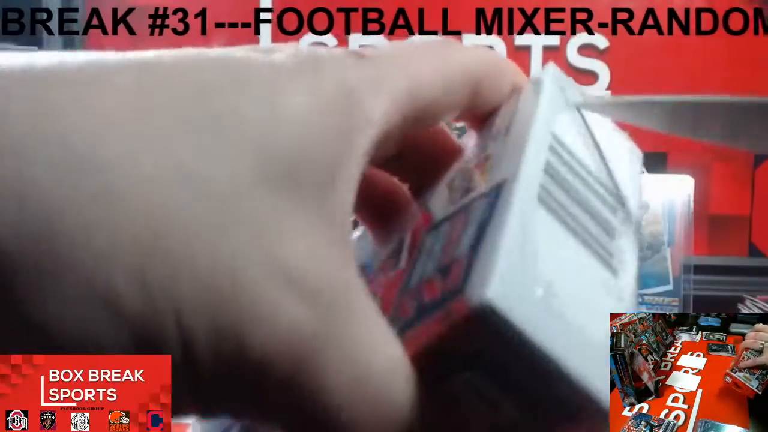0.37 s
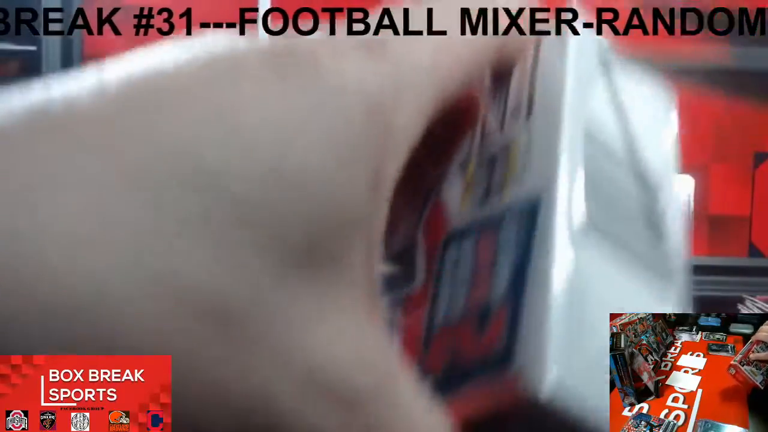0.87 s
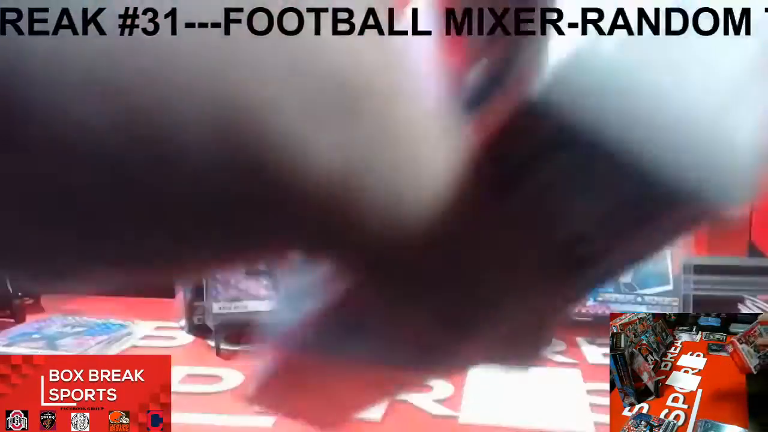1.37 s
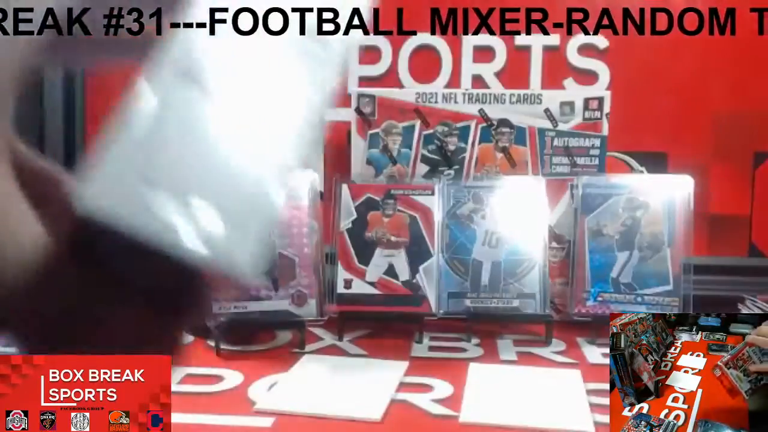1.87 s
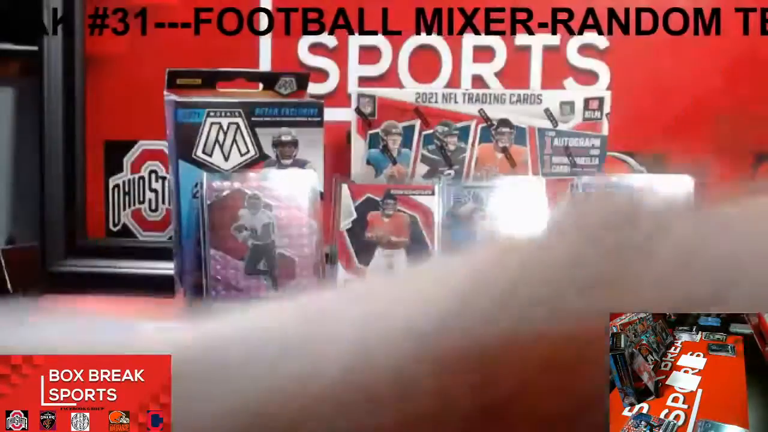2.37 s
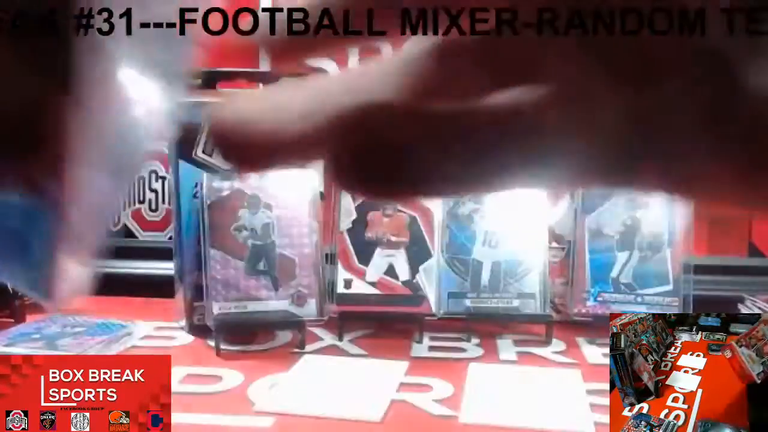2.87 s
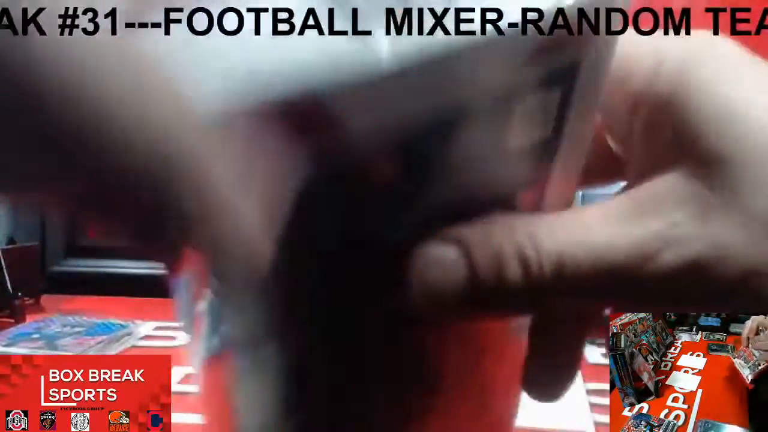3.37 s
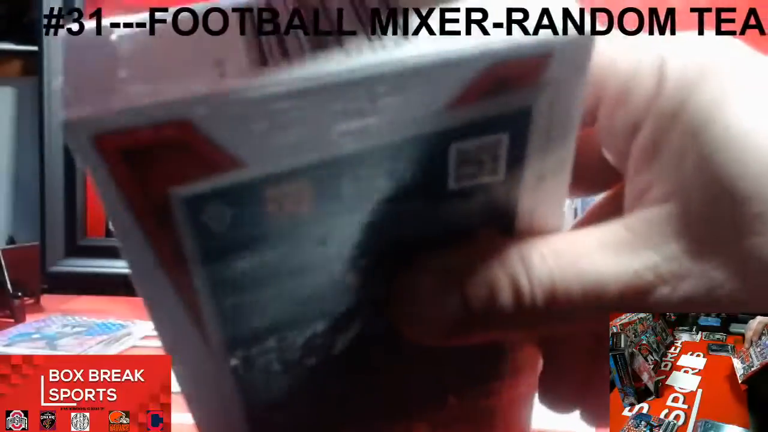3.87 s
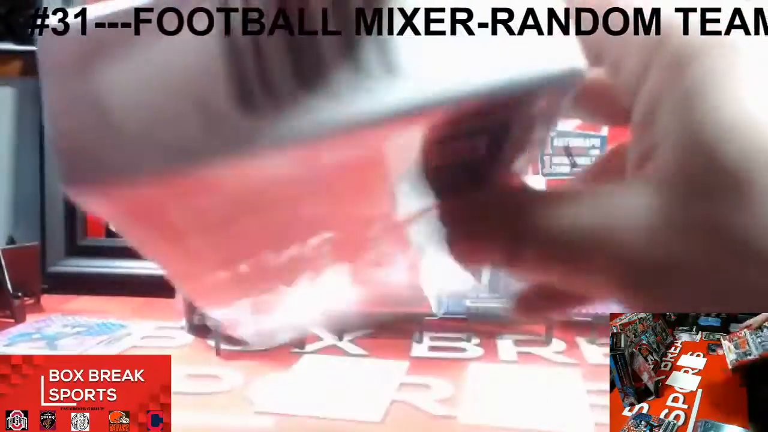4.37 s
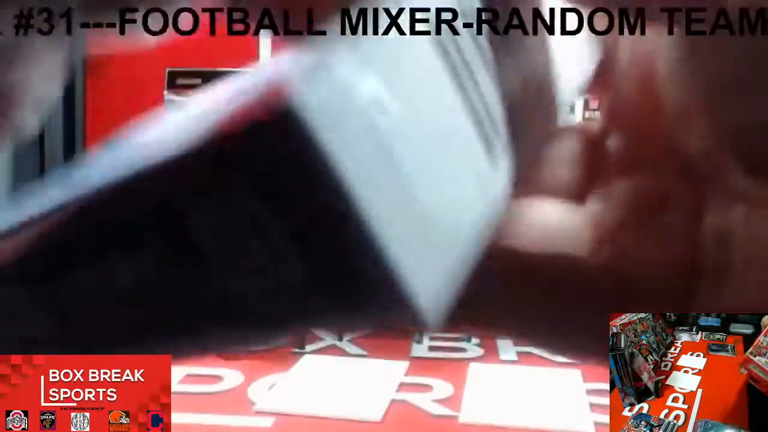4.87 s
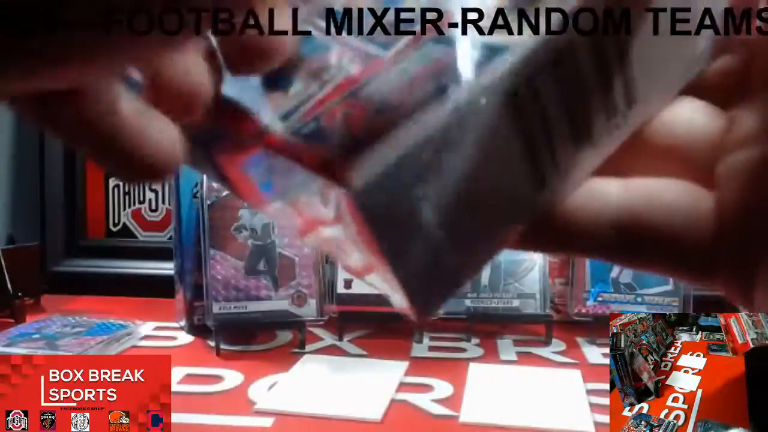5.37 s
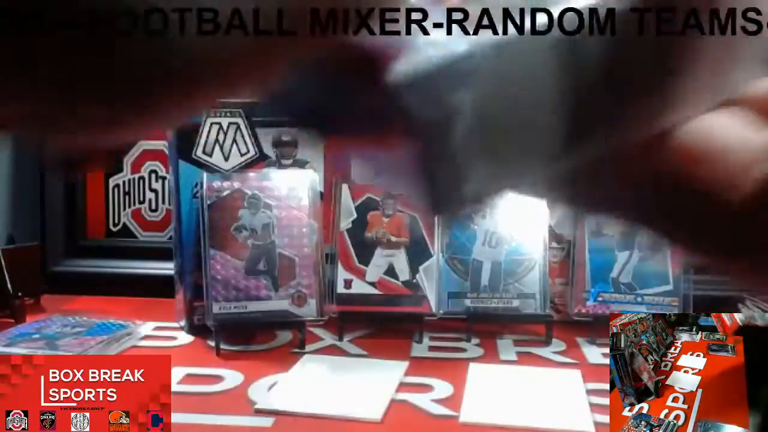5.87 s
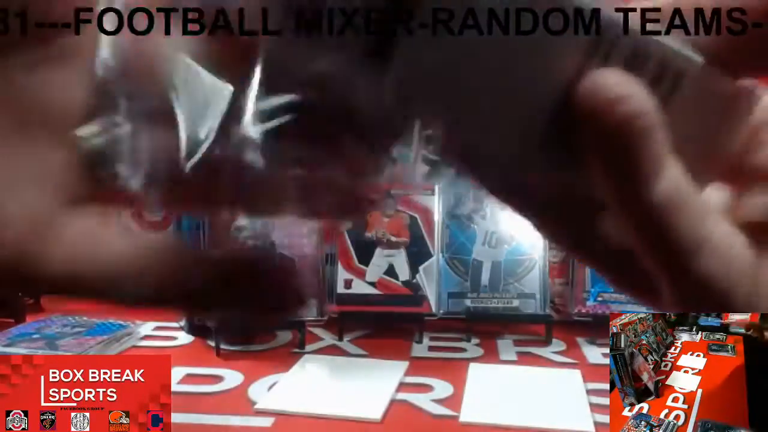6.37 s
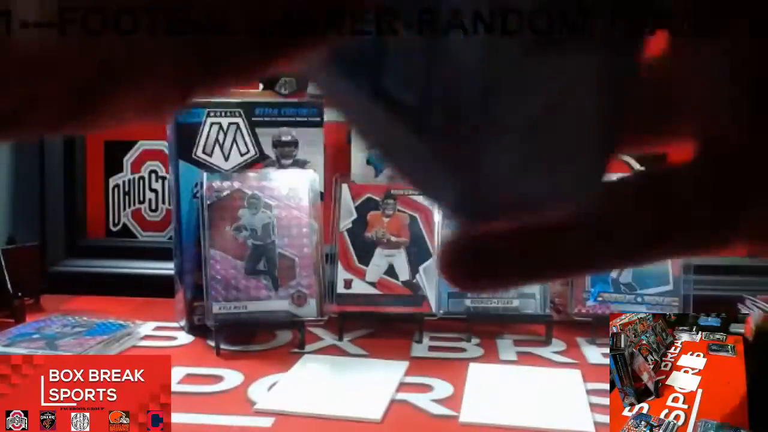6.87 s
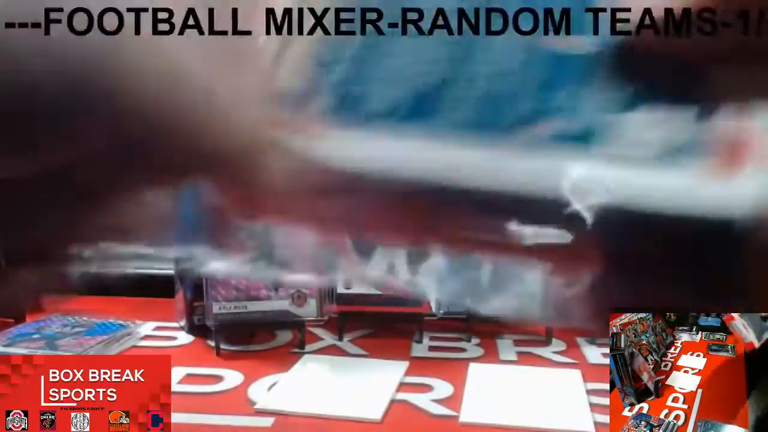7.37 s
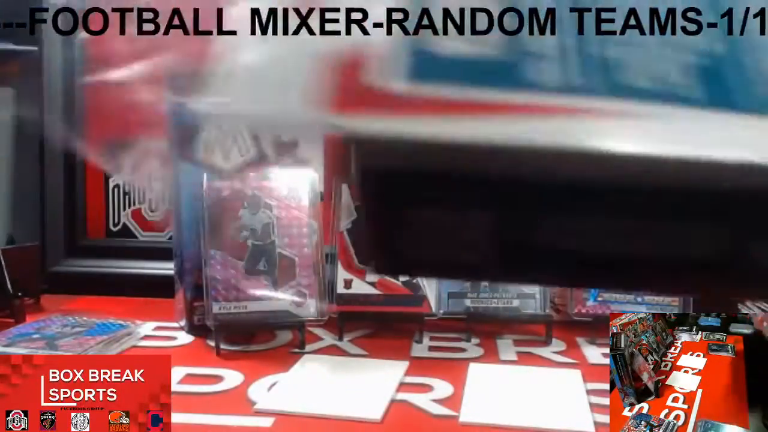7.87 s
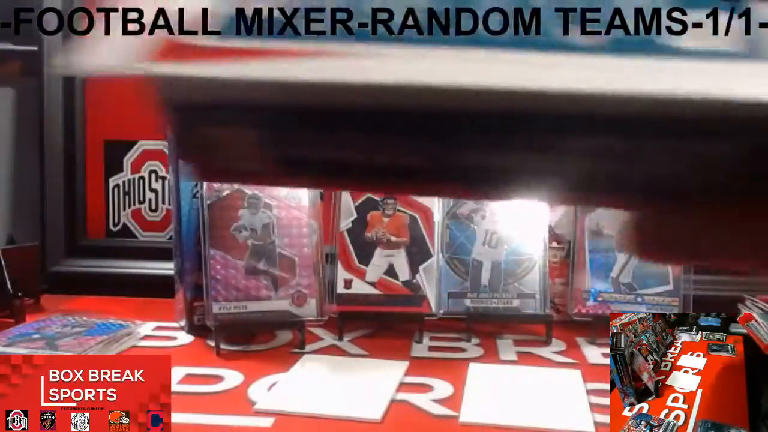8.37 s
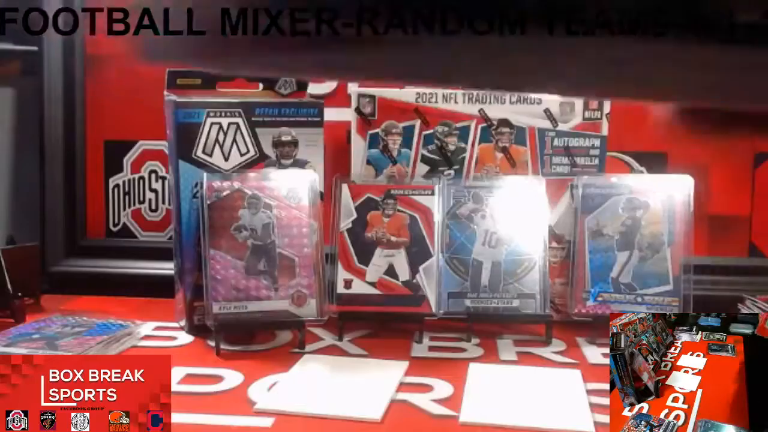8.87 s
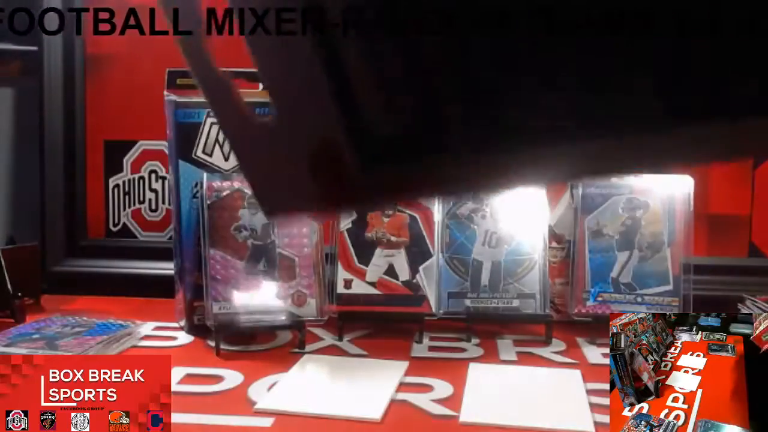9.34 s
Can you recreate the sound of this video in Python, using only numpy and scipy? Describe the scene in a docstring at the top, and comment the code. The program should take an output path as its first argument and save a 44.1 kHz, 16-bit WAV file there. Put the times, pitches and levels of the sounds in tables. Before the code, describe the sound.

A small, hard-walled room with low hiss, rumble and a faint wavering fan hum; hands work very near the microphone. A small click at 0.2 s and soft airy slides over taut film lead to a loud, crisp snip at about 1.1 s, with tiny ticks after. From 2.4 to 2.65 s scissors land on a wooden table in several quick knocks with a short metallic ring, then rock in soft low double thuds, ever slower, until about 4.8 s. From 4 s film ticks and crackles sparsely, growing busier from 5 s. Two hard snaps near 5.95 s begin vigorous crinkling; the loudest crumpling comes around 7.3 to 7.5 s, with another bright burst near 7.9 s and light hollow box taps. After 8.1 s it thins to scattered, slower creases, nearly quiet around 9 s, then a last crackly rustle at 9.5 s.

```python
"""A small hard-walled room with a faint fan hum and hiss: hands work close to the microphone.
They snip the film on a small card box, drop the scissors on the table, where they rock to rest, then peel
and crumple the crackling film and work the flap open. Cuts, landings and creases are coloured noise cracks;
rustle is clumped tiny pops, slides are shaped hiss; scissors, table and box ring as decaying sines.
Echoes and blurred tails surround the hands, and for instants the sound widens between the ears."""
import sys
import numpy as np
from scipy import signal
from scipy.fft import rfft, irfft
from scipy.io import wavfile
from scipy.ndimage import uniform_filter1d

SR = 44100
rng = np.random.default_rng(int(sys.argv[2]) if len(sys.argv) > 2 else 0)


def amplitude_ratio(level_db):
    """Convert a level in decibels to the matching linear amplitude (field) ratio."""
    exponent = np.asarray(level_db, float) / 20
    return 10 ** exponent


def log_audio(samples):
    """Write samples as a 16-bit WAV file to the path given in sys.argv[1]."""
    # one column per channel
    frames = np.atleast_2d(samples).T
    # limit to full scale, then quantise
    limited = np.clip(frames, -1, 1)
    pcm = np.round(limited * 32767).astype(np.int16)
    wavfile.write(sys.argv[1], SR, pcm)


N = 429093


def evened(x):
    """Scales to rms 1."""
    return x / np.sqrt(np.mean(x ** 2) + 1e-20)


def read(points, hz):
    """Reads a curve on a log-frequency axis."""
    f, value = np.transpose(points)
    return np.interp(np.log(hz + 1), np.log(f + 1), value)


def colour(x, points):
    """Filters the last axis by a spectrum in dB."""
    hz = np.fft.rfftfreq(x.shape[-1], 1 / SR)
    return irfft(rfft(x) * amplitude_ratio(read(points, hz)), x.shape[-1])


def add(mix, s, sound):
    """Mixes a sound in at a time in seconds."""
    part = mix[round(s * SR):][:len(sound)]
    part += sound[:len(part)]


def bursts(rows, body, lumps_db, usual_db, sheen_db, t60):
    """Cracks with the colour of the patch that moves, and matching clicks for the far walls to blur.
    usual_db: the body's own boom and rasp; sheen_db: treble against the body."""
    near, far = np.zeros(N), np.zeros(N)
    size = 4096
    t, hz = np.arange(size) / SR, np.fft.rfftfreq(size, 1 / SR)
    noises = rng.standard_normal((len(rows), size))
    lump_draws = rng.standard_normal((len(rows), 24))
    slip_draws = rng.random((len(rows), 2, 3))
    bass = read([(500, 1), (1500, 0)], hz)
    dull = 0.2  # dB of sheen lost per dB of slowness
    for row, noise, lump_draw, (late, strength) in zip(rows, noises, lump_draws, slip_draws):
        start_s, peak_db, boom_db, rasp_db, slowness_db = row
        low_db, mid_db = np.subtract((boom_db, rasp_db), usual_db)
        tilt = [(900, low_db), (1600, mid_db), (3300, mid_db), (4800, 0), (8000, 0),
                (10000, sheen_db - dull * slowness_db)]
        lumps = np.interp(np.log(hz + 1), np.linspace(5, 10, 24), lump_draw)
        shape = amplitude_ratio(read(body, hz) + read(tilt, hz) + lumps_db * lumps)

        # a crease that rolls over slowly lasts longer and fills the room more
        stretch = amplitude_ratio(0.74 * slowness_db)
        fade = amplitude_ratio(-60 * t / (t60 * stretch)) * np.minimum(t / (0.00026 * stretch), 1)
        for k in range(3):  # the crease gives way again in smaller slips
            delay = int(late[k] * 0.014 * stretch * SR)
            fade += 0.5 * strength[k] * np.roll(fade, delay)
        # the bass builds more slowly
        swell = amplitude_ratio(-60 * t / (t60 * stretch + 0.035)) * np.minimum(t / 0.008, 1)

        z = rfft(noise) * shape
        crack = irfft(z * (1 - bass)) * fade + 1.06 * irfft(z * bass) * swell
        crack *= amplitude_ratio(peak_db) / abs(crack).max()
        click = np.roll(irfft(shape), 128)[:1024] * signal.windows.tukey(1024, 0.2)
        add(near, start_s, crack)
        add(far, start_s, amplitude_ratio(peak_db + slowness_db) * click / np.linalg.norm(click))
    return np.array([near, far])


# treble of each kind of crack above 9 kHz, before slowness dulls it: kind, sheen_db
SHEEN = {"snip": 0.5, "snap": 1, "landing": 8}
# colour of film on card: pitch_hz, level_db (per Hz)
FILM = [(110, -44.5), (180, -12), (328, -5.5), (888, -8.5), (1130, -8), (1500, -4), (1780, -9),
        (1950, -6.5), (6870, 1.5), (12100, -9.5), (16000, -26)]
# blades touch and cut the film, dry: start_s, peak_db,
# boom_db (250-1200 Hz, relative), rasp_db (card, 1200-4000 Hz, relative), slowness_db
SNIPS = [(0.164, -30.5, -15.5, -8, -4.5), (0.466, -46.5, -8, -10, 0.5), (0.986, -45.5, -40, -4, -12),
         (1.072, -10.5, -13.5, -6.5, -4.5), (1.104, -20, -13.5, -18, -7.5), (1.405, -49.5, 7, 10, 0.5),
         (1.453, -51, -2, -15, -12), (1.797, -46.5, -26, -13, -9)]


def snips():
    """Closing blades part the film in short bright cracks."""
    return bursts(SNIPS, FILM, 1.1, (-20, -12), SHEEN["snip"], 0.014)


# creases in film and card snap over, dry: start_s, peak_db,
# boom_db (250-1200 Hz, relative), rasp_db (card, 1200-4000 Hz, relative), slowness_db
SNAPS = [(3.004, -49.5, 7.5, 4.5, 10), (3.274, -45.5, -9.5, -4, 9.5), (3.545, -58.5, -4, -9, 13),
         (3.829, -57, 1, -4, 6), (4.013, -54.5, -14, -11, 8), (4.036, -47, -10, 5, 1),
         (4.103, -36.5, -1.5, -1, -9.5), (4.124, -33.5, -42, -9, -7), (4.257, -56, -16, -19, -4),
         (4.3, -51, -42, -8, -3), (4.3344, -28.5, -16.5, -13, -4), (4.491, -47, -17, 18, -6),
         (4.5053, -23.5, -31, -9, -19), (4.518, -26, -14, -4, -1.5), (4.673, -48, -22, -22, -11),
         (4.753, -52, -1, -14, -7), (4.9103, -23, -50, -27, -8.5), (5.017, -39, -23, -33, -4.5),
         (5.071, -39.5, -8, -7, -0.5), (5.12, -28, -25, -19, -7.5), (5.193, -33.5, -10, -11.5, -1),
         (5.289, -40.5, -19, -16, -1), (5.2995, -32.5, -17, -9, 1), (5.386, -30.5, -13.5, -12, 1),
         (5.398, -22.5, -23, -24, -9), (5.6105, -27, -24, -4, -5.5), (5.68, -40, -15, -9, 6.5),
         (5.728, -31, -19.5, -9, -6.5), (5.804, -37, -19, -8, 7), (5.852, -20, -21.5, -15, -1),
         (5.892, -29.5, -15, -18, 6), (5.93, -11, -23, -17.5, -2.5), (5.956, -10.5, -18, -18, 4.5),
         (6.0065, -18, -11.5, 4, 2.5), (6.071, -14, -13.5, -9.5, -6.5), (6.1885, -26.5, -38, -9.5, -11.5),
         (6.219, -31, -8.5, -3, 5), (6.263, -23, -19, -2, -8.5), (6.241, -34, -30, -14.5, -10),
         (6.312, -17.5, -29, -12.5, -6), (6.479, -31, 0, 0.5, 0.5), (6.519, -31.5, -11, -2, 1),
         (6.635, -21.5, -18.5, -16.5, -3), (6.659, -28.5, -26, -10, -2), (6.7126, -19, -27.5, -11.5, -6.5),
         (6.767, -21.5, -47, -33, -22.5), (6.838, -38, -21, -10, -6), (6.864, -33.5, -11, -6, -3.5),
         (6.882, -31, -5, -2.5, 4), (6.922, -31.5, -24, -27.5, -3), (7.011, -32.5, -9, -14, -1),
         (7.073, -26.5, -21.5, -6, -3), (7.09, -18.5, -16, -7, 2), (7.254, -16.5, -14.5, -6.5, 3.5),
         (7.334, -23, -14, -6, 7), (7.371, -17, -19.5, -14, 5.5), (7.41, -11.5, -11, -11.5, 2.5),
         (7.455, -9.5, -15.5, -14.5, -3.5), (7.55, -16.5, -46, -8, 6), (7.587, -17, -20, -19, -9.5),
         (7.646, -18.5, -34, -8, -7), (7.7066, -15, -12, -2.5, -5), (7.825, -27.5, -35, -14, 8),
         (7.855, -15, -13.5, -7, -1), (7.892, -26.5, -34, -10, 13), (7.9615, -23, -42, -7, -1.5),
         (7.993, -23.5, -49, -31, -12), (8.009, -30, -36, -17, -16), (8.025, -22.5, -38, -3, 0),
         (8.049, -21, -40, -8.5, -3.5), (8.108, -31.5, -25, -5.5, 6.5), (8.162, -35, -15, -0.5, 12),
         (8.258, -37, -26, -5, -11.5), (8.319, -25.5, -20, -10.5, -5), (8.335, -25, -13, 0, -1),
         (8.448, -36.5, -22, -5, 5), (8.48, -35.5, -16, -7.5, 10.5), (8.515, -35.5, -14, -5.5, 10),
         (8.6, -46, -14, 2, 7.5), (8.654, -38, -10.5, -2.5, 5.5), (9.082, -58.5, 0, 7, 13.5),
         (9.179, -42.5, -5.5, 0, 4.5), (9.435, -44, -9, -1.5, 7.5), (9.452, -37, -13, -3, 10),
         (9.503, -29, -30, -1, 9)]


def snaps():
    """Creases buckle and snap over, with a longer decay than the cuts."""
    return bursts(SNAPS, FILM, 1.96, (-20, -13), SHEEN["snap"], 0.031)


# fingers work the film: start_s, rustle_db, rub_db (lift of the card rub below 3000 Hz)
RUSTLE = [(3.9, -83.5, 15.5), (4.18, -80.5, 32.5), (4.3, -74, -4), (4.7, -74.5, 10.5), (5.0, -83, 19),
          (5.08, -62, 13.5), (5.27, -72, 7.5), (5.42, -67, 18.5), (5.78, -64, 9), (5.9, -42, 6),
          (6.08, -45, 8), (6.2, -58, 10), (6.45, -54.5, 9.5), (6.8, -59.5, 3), (7.05, -55, 4.5),
          (7.11, -42, 4), (7.24, -43, 0), (7.3, -36.5, 2), (7.47, -30.5, 7), (7.6, -60, 17), (7.74, -55, 2),
          (7.86, -38.5, 4), (8.2, -65.5, 16.5), (8.4, -71, 13), (8.54, -57.5, 15), (8.75, -74.5, 17),
          (9.0, -76.5, 9), (9.41, -73.5, 12.5), (9.52, -44, 10.5), (9.73, -85, -4)]


def rustle():
    """Countless tiny creases pop in clumps, their resonances shifting as the sheet bends."""
    pops_per_s, spread_db, clump_db, patchy_db = 2500, -2.5, 6.5, 3
    boom_db = -1.5  # rub below 1200 Hz against the rub above
    clumps = amplitude_ratio(clump_db * evened(uniform_filter1d(rng.standard_normal(N), 500)))
    sizes = amplitude_ratio(spread_db * np.minimum(rng.exponential(1, N), 3))
    pops = sizes * (rng.random(N) < pops_per_s / SR)
    decay = np.exp(-1 / (0.00024 * SR))
    grain = signal.lfilter([1], [1, -decay], pops * clumps) * rng.standard_normal(N)
    hz, t, z = signal.stft(evened(colour(grain, FILM)), SR, nperseg=256, noverlap=192)

    s, film_db, rub_db = np.transpose(RUSTLE)
    low = read([(900, 1), (1500, 0)], hz)[:, None]
    mid = read([(900, 0), (1500, 1), (2600, 1), (3600, 0)], hz)[:, None]
    # neighbouring bands and moments shift together
    patches = rng.standard_normal(z.shape[::-1]).T
    patches = evened(uniform_filter1d(uniform_filter1d(patches, 3, 0), 20, 1))
    field_db = np.interp(t, s, film_db, -120)
    field_db = field_db + (low + mid) * np.interp(t, s, rub_db) + low * boom_db
    z = z * amplitude_ratio(field_db + patchy_db * patches)
    return signal.istft(z, SR, nperseg=256, noverlap=192)[1][:N]


# scissors land on the table, dry: start_s, peak_db (of the crack),
# boom_db (250-1200 Hz, relative), rasp_db (1200-4000 Hz, relative), slowness_db
LANDINGS = [(2.437, -27.5, -15.5, -15, 5.2), (2.505, -26.5, -7.5, -13, 0.7), (2.513, -33, 2, -29, 1),
            (2.585, -32, 21, -13, 1), (2.599, -15.5, -18, -9, 1.5), (2.64, -21.5, -7.5, -11.5, 1.2)]
# colour of scissors on wood: pitch_hz, level_db (per Hz)
STEEL = [(35, -43), (60, -5), (91, -11), (262, 5), (380, -9), (842, 0), (968, -7.5), (2140, 1.5),
         (2580, -11.5), (2900, -1.5), (4640, -19), (6140, -20.5), (16000, -52.5)]


def landings():
    """Steel knocks wood: each blow is a short crack of coloured noise."""
    return bursts(LANDINGS, STEEL, 4.2, (-8, -4), SHEEN["landing"], 0.016)


# modes of blades and handles: pitch_hz, level_db (before the strike spot varies it), t60_s
SCISSORS = [(464, -2, 0.42), (840, -6, 0.15), (1269, 7, 0.13), (1540, -11, 0.11), (1890, -15, 0.053),
            (2267, 3.5, 0.14), (2650, 5, 0.067), (2930, -3.5, 0.08), (3480, -4, 0.081), (4060, -16, 0.1),
            (4820, -12, 0.118)]


def clatter():
    """Each landing rings the modes of the scissors, struck at a different spot."""
    out, t = np.zeros(N), np.arange(6000) / SR
    spots = rng.standard_normal((len(LANDINGS), len(SCISSORS)))
    for (start_s, peak_db, *_), spot in zip(LANDINGS, spots):
        ring = np.zeros(len(t))
        for (hz, level_db, t60), k in zip(SCISSORS, spot):
            ring += amplitude_ratio(level_db + 4.0 * k - 60 * t / t60) * np.sin(2 * np.pi * hz * t)
        add(out, start_s, amplitude_ratio(peak_db - 26) * ring)
    return out


# the scissors rock on the table top, ever slower: start_s, level_db (scales the modes below)
ROCKS = [(2.746, -44.5), (2.864, -53), (2.911, -49), (2.966, -48), (3.198, -46.5), (3.431, -46.5),
         (3.665, -48.5), (3.908, -49.5), (4.166, -53), (4.44, -51), (4.746, -54.5)]
# modes of the table top: pitch_hz (before detuning), level_db (relative), t60_s
TABLE_TOP = [(240.3, 2.5, 0.076), (269, -4, 0.054), (622, 4.5, 0.022)]


def rocking():
    """Soft blows a few milliseconds long ring the low modes of the table top."""
    rebound_s, rebound_db = 0.038, -2.5  # the other handle touches just after
    out, t = np.zeros(N), np.arange(6000) / SR
    detunes = rng.uniform(-1, 1, (len(ROCKS), len(TABLE_TOP)))
    for (start_s, level_db), detune in zip(ROCKS, detunes):
        ring = np.zeros(len(t))
        for (hz, mode_db, t60), k in zip(TABLE_TOP, detune):
            ring += amplitude_ratio(mode_db - 60 * t / t60) * np.sin(2 * np.pi * hz * (1 + 0.056 * k) * t)
        ring *= np.sin(np.pi / 2 * np.minimum(t / 0.0085, 1)) ** 2  # soft onset
        add(out, start_s, amplitude_ratio(level_db) * ring)
        add(out, start_s + rebound_s, amplitude_ratio(level_db + rebound_db) * ring)
    return out


# a palm slides over the taut film: start_s, length_s, level_db (of the hiss)
SLIDES = [(0.044, 0.048, -76), (.44, 0.12, -67), (0.75, 0.11, -65.5), (0.906, 0.03, -66.5),
          (0.98, 0.016, -94)]


def slides():
    """Smooth friction hiss in the treble: each stroke rises, holds and fades."""
    rise_share, fade_db_per_s = 0.58, 500  # share of the stroke spent rising; fade once the palm stops
    t, level = np.arange(N) / SR, np.zeros(N)
    for start_s, length_s, level_db in SLIDES:
        rise = np.clip((t - start_s) / (rise_share * length_s), 0, 1)
        level += rise * amplitude_ratio(level_db - fade_db_per_s * np.maximum(t - start_s - length_s, 0))
    friction = [(2500, -24.5), (4500, -11.5), (6500, -0.5), (10000, -8), (16000, -20)]  # (Hz, dB)
    return level * evened(colour(rng.standard_normal(N), friction))


# fingertips and blades tap the hollow box: start_s, level_db (scales the modes below), pitch_hz,
# t60_s (at that pitch; the other modes decay in proportion to their pitch)
TAPS = [(.405, -70.5, 554, 0.11), (.985, -69, 1280, 0.04), (1.405, -67, 960, 0.083),
        (1.41, -72.5, 312, 0.22), (1.455, -63.5, 1235, 0.03), (4.165, -57, 900, 0.064),
        (4.511, -56.5, 1256, 0.063), (5.195, -46, 1360, 0.011), (6.886, -43.5, 1250, 0.035),
        (7.871, -48.5, 1436, 0.14)]
# panel modes: multiple of the tap's pitch_hz, level_db (relative)
BOX = [(1.002, 16), (1.17, -7), (2.3, 11), (2.55, -4)]


def taps():
    """A soft touch rings a panel of the box."""
    out, t = np.zeros(N), np.arange(6000) / SR
    for start_s, level_db, hz, t60 in TAPS:
        ring = np.zeros(len(t))
        for k, mode_db in BOX:
            ring += amplitude_ratio(mode_db - 60 * k * t / t60) * np.sin(2 * np.pi * k * hz * t)
        add(out, start_s, amplitude_ratio(level_db) * ring * np.minimum(t / 0.0029, 1))
    return out


# decay of the room: pitch_hz, t60_s
ROOM = [(150, 0.46), (400, 0.47), (1000, 0.47), (2800, 0.35), (7000, 0.38), (14000, 0.28)]


def tails(count):
    """Sparse taps of random sign, each band dying at its own speed."""
    impulses = np.zeros((count, SR))
    starts = np.arange(200, SR - 20, 20)
    places = starts + rng.integers(0, 20, (count, len(starts)))
    signs = rng.choice([-1., 1.], (count, len(starts)))
    np.put_along_axis(impulses, places, signs, 1)
    hz, t, z = signal.stft(impulses, SR, nperseg=256)
    tail = signal.istft(z * amplitude_ratio(-60 * t / read(ROOM, hz)[:, None]), SR, nperseg=256)[1]
    return tail / np.linalg.norm(tail, axis=1)[:, None]


# reflections from near surfaces: delay_s, level_db
ECHOES = [(.003, -16.5), (.0075, -14), (0.011, -14), (.034, -11.5)]


def room(near, far):
    """Direct sound and early echoes, then three tails fed in turn as the hands move about."""
    turns_per_s = 4.3  # how often each tail is fed most strongly
    t = np.arange(N) / SR
    phases = np.array([np.pi * (turns_per_s * t + k / 3) for k in range(3)])
    feeds = np.sqrt(2 / 3) * np.cos(phases)
    wet = signal.oaconvolve(far * feeds, tails(count=3), axes=1)[:, :N].sum(0)
    early = np.zeros(N)
    for delay_s, level_db in ECHOES:
        add(early, delay_s, amplitude_ratio(level_db) * near)
    return near + early + wet


# hiss and rumble: pitch_hz, level_db (per Hz, relative)
HISS = [(12, -41.5), (20, -21), (32, -15), (110, -21.5), (130, -23.5), (154, -29.5), (270, -30),
        (328, -32.5), (825, -34.5), (1090, -35), (1190, -34), (2530, -35.5), (6180, -46.5), (10500, -49),
        (16000, -55)]
# the fan hum: pitch_hz (centre), wander_hz (rms), level_db (rms)
HUM = (118.4, 3, -73.5)


def background():
    """Steady hiss and rumble with one wavering hum line."""
    hz, wander_hz, hum_db = HUM
    wander = evened(uniform_filter1d(rng.standard_normal(N), 9000))
    hum = np.sqrt(2) * np.sin(2 * np.pi * np.cumsum(hz + wander_hz * wander) / SR)
    hiss = evened(colour(rng.standard_normal(N), HISS))
    return amplitude_ratio(-66.5) * hiss + amplitude_ratio(hum_db) * hum


# instants of widening: centre_s, length_s, side_db (against mid, before the colour below)
SPREADS = [(1.063, 0.046, -18), (4.299, 0.068, 8), (5.086, 0.14, 5), (5.602, 0.043, 4), (5.939, 0.05, -9.5),
           (6.714, 0.015, -11), (7.42, 0.041, -23), (8.016, 0.13, -0.5)]
# where the spread acts: pitch_hz, level_db
WIDTH = [(100, -9), (3800, -30), (4600, -12), (16000, -3.5)]


def widen(mid):
    """A noise-blurred copy, opposite in the two ears, widens the sound for an instant."""
    t, spread = np.arange(N) / SR, np.zeros(N)
    for centre_s, length_s, side_db in SPREADS:
        spread += amplitude_ratio(side_db) * np.exp(-(2 * (t - centre_s) / length_s) ** 4)
    blur = rng.standard_normal(400)
    blurred = signal.oaconvolve(mid, blur / np.linalg.norm(blur))[:N]
    side = spread * colour(blurred, WIDTH)
    return np.array([mid + side, mid - side])


def scene():
    """One microphone hears it all; the channels part only for instants."""
    near, far = snips() + snaps() + landings()
    steady = rustle() + slides() + rocking()
    hands = room(near + steady + taps() + clatter(), amplitude_ratio(13.5) * far + steady)
    return widen(hands + background())


def top_cut(x):
    """Nothing passes above the cut-off."""
    return signal.sosfilt(signal.butter(12, 16820, fs=SR, output="sos"), x)


# converter offset, one row each for left and right: offset (full scale = 1)
OFFSET = [
    [-.0041],
    [-.0033],
]


def record(dry):
    """Loud peaks round off smoothly and the converter adds a small constant offset."""
    limit = 0.28  # ceiling of the rounding, full scale = 1
    rounded = limit * np.tanh(dry / limit)
    mix = rounded + np.array(OFFSET)
    return top_cut(mix)


dry = scene()
out = record(dry)
log_audio(out)
```